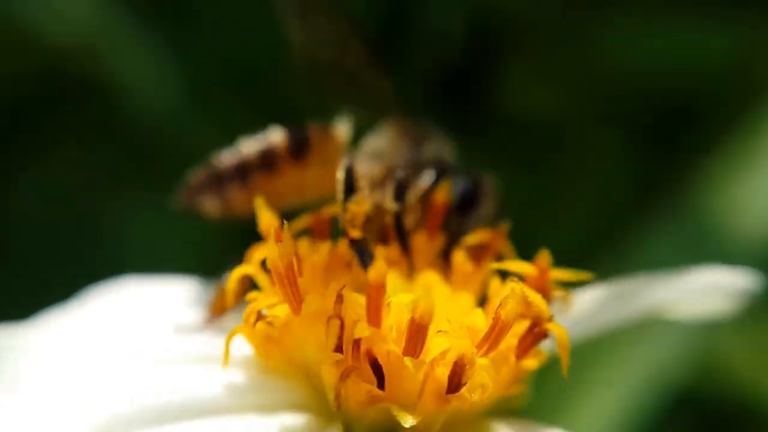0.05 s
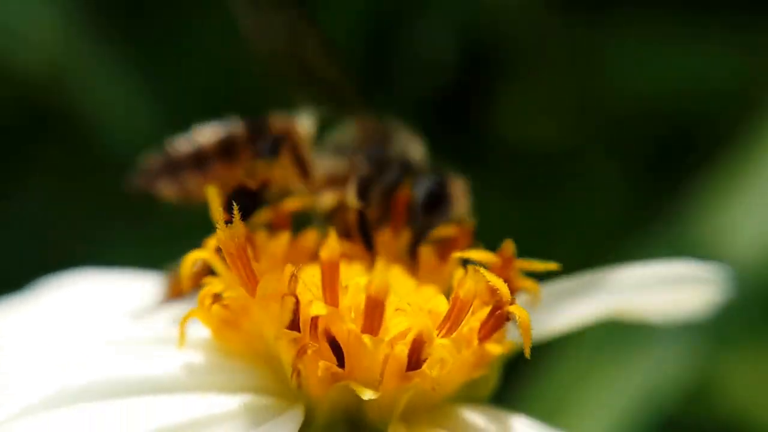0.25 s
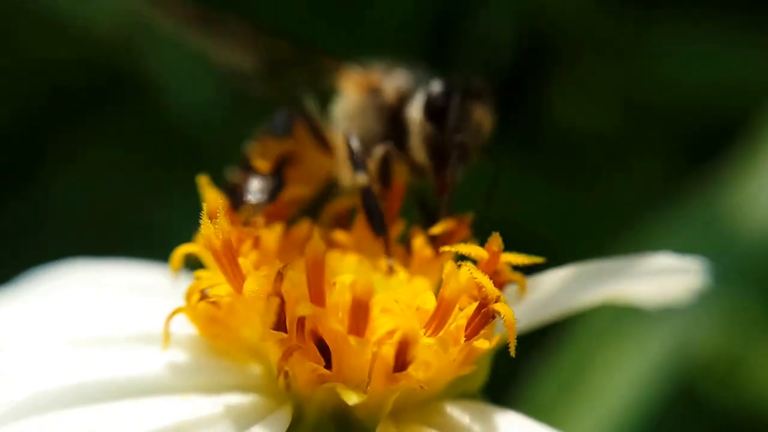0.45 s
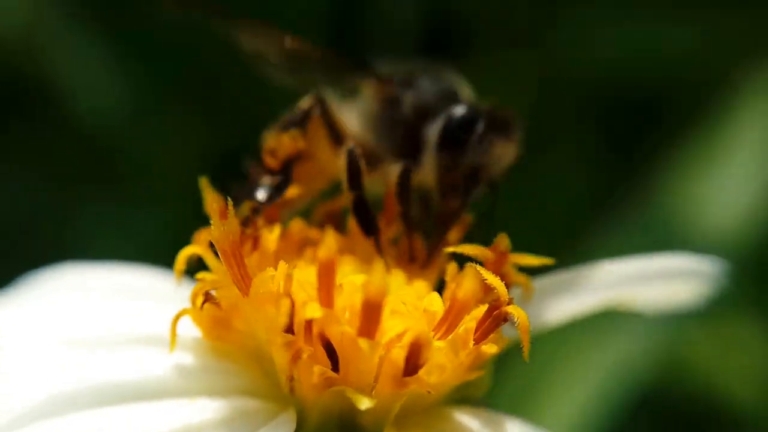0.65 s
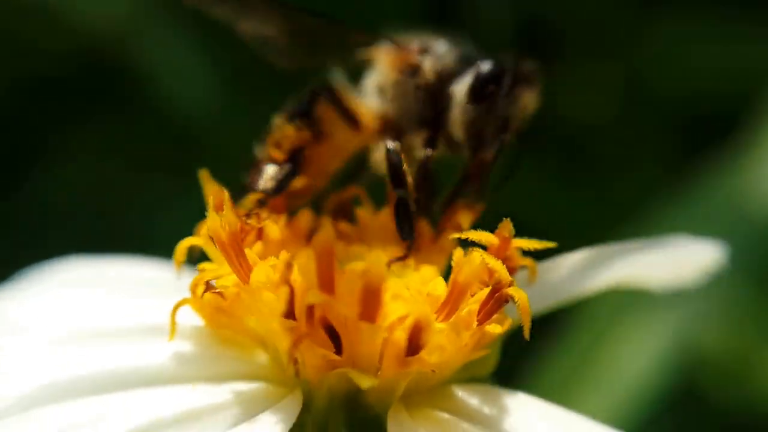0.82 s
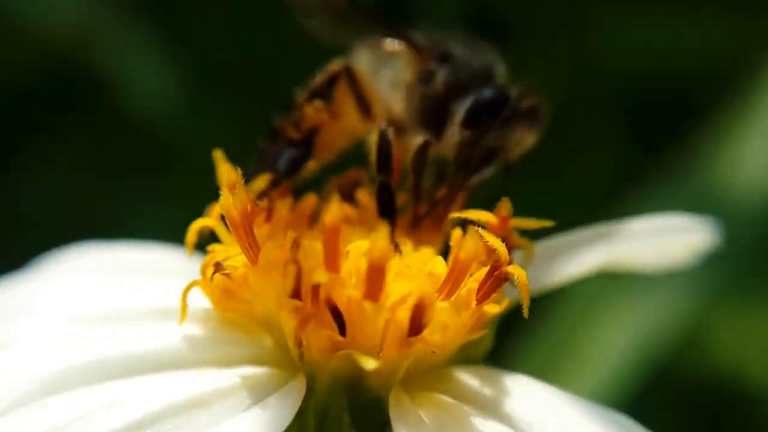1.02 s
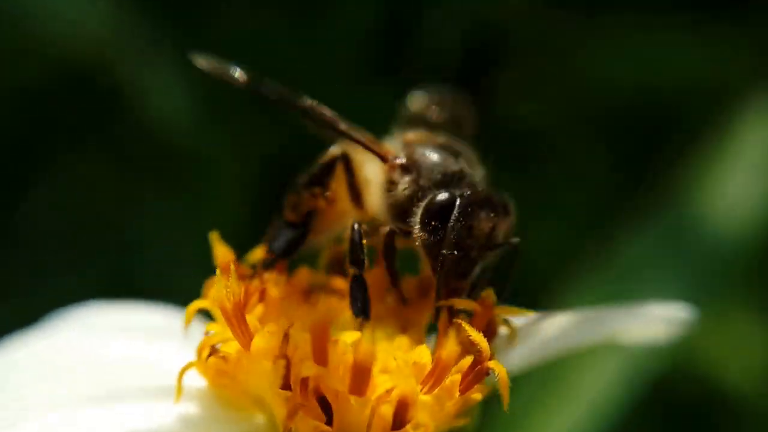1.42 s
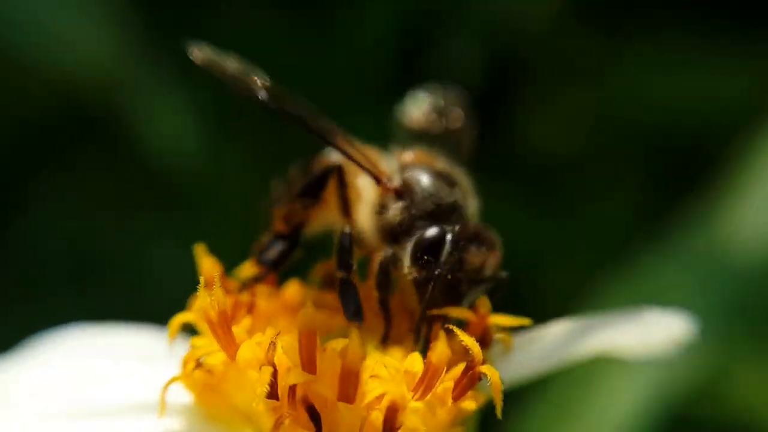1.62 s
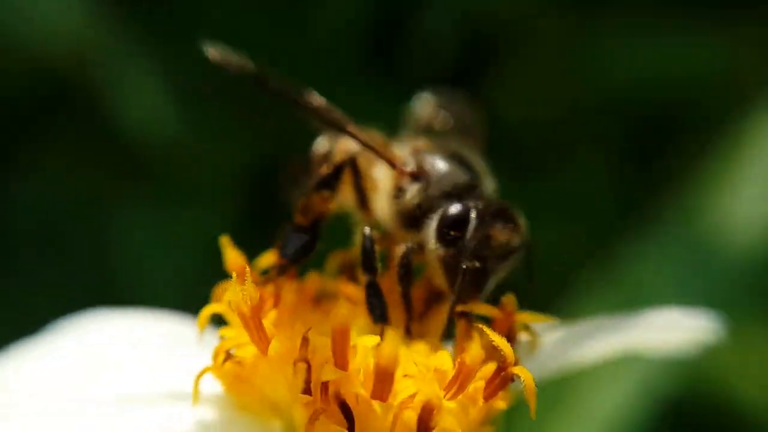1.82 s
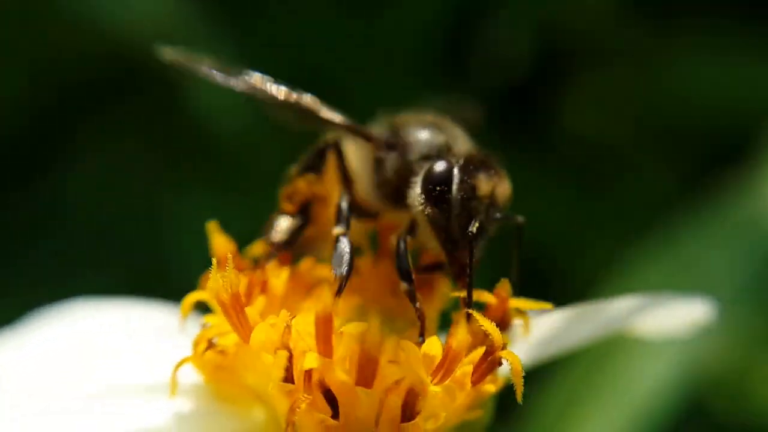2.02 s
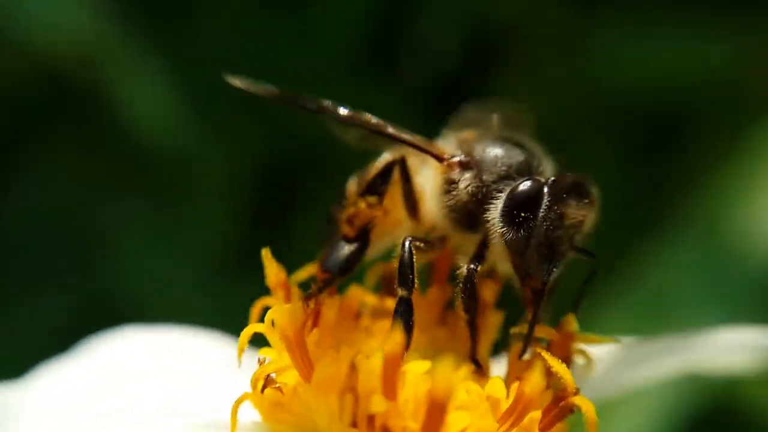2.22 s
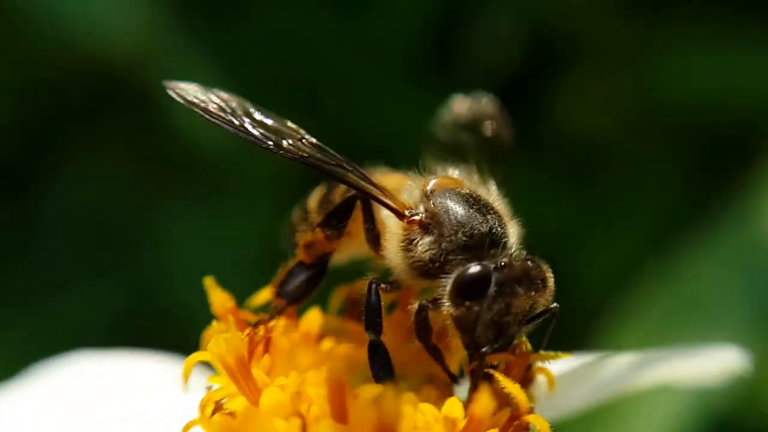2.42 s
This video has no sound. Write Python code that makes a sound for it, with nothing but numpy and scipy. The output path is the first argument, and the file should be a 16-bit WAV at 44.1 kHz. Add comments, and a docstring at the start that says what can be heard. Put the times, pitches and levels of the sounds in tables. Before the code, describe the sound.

A small bird chirps four times nearby over a faint outdoor rumble and hiss.

```python
"""Four high chirps from a small bird, close on the right: two arching whistles that fall away,
one that sweeps upward, then another arch. Each is a gliding tone with a weak octave.
Nearby surfaces scatter the calls back to the microphones and a faint long echo follows.
Behind the bird lie a steady distant rumble, a faint low drone that swells once,
a far-off bird and a soft outdoor hiss."""
import sys
import numpy as np
from scipy import signal
from scipy.fft import rfft, irfft, next_fast_len
from scipy.io import wavfile
from scipy.ndimage import uniform_filter1d, map_coordinates

SR = 44100
rng = np.random.default_rng(int(sys.argv[2]) if len(sys.argv) > 2 else 0)


def digitize_waveform(pressure):
    """Quantize a signal to 16-bit integers and store it at the path in sys.argv[1].

    Rows of a 2-D input are taken as channels; values are limited to [-1, 1].
    """
    field = np.atleast_2d(pressure).T
    bounded = np.clip(field, -1, 1)
    quanta = np.round(bounded * 32767).astype(np.int16)
    wavfile.write(sys.argv[1], SR, quanta)


N = 112454

# the two shapes of whistle: t/length, f/top pitch, level/dB
ARCH = [(0, .64, -39), (0.069, .84, -21), (.13, 0.9737, -3), (0.239, 0.9933, 1), (.35, 0.97, 0),
        (0.501, .91, -5.5), (.75, 0.73, -12.5), (0.999, .58, -27)]
UPSWEEP = [(0, .68, -29), (0.101, .74, -16.5), (0.329, .82, -11), (0.438, .90, -6.5), (.53, 0.99, 1),
           (.64, 0.963, 0), (0.781, .81, -16), (1, 0.56, -27.5)]
# close bird: start t/s, length t/s, top f/Hz, level/dB, start-to-end gain/dB, octave level/dB, shape
CHIRPS = [(0.202, .101, 5397, -10.5, -2.5, -42.5, ARCH), (.933, 0.0977, 5351, -12.5, -5, -45.5, ARCH),
          (1.543, .079, 5448, -12, 0, -40.5, UPSWEEP), (2.143, 0.1, 5207, -13.5, 2, -40, ARCH)]
# colour of the second harmonic: f/Hz, level/dB
OCTAVE_COLOUR = [(6200, -8), (7700, -1.5), (9000, -2), (10200, -4.5), (10800, -14)]
# second voice, opening the arching chirps: start t/s, level/dB
WISPS = [(0.196, -29.5), (.927, -33.5), (2.134, -29.5)]
# colouring of both birds by the left microphone: f/Hz, level/dB
LEFT_SHADE = [(3000, -3.5), (4000, -8.5), (4800, -7), (5400, -13), (10000, -20.5)]
# calls of the far-off bird: middle t/s, level/dB
FAR_CALLS = [(.685, -51), (1.33, -53)]
# spectra of the far calls, the rumble and the hiss on each side: f/Hz, relative level/dB
FAR_COLOUR = [(4800, -40), (5900, -2), (6600, 0), (7100, -7.5), (8200, -40)]
RUMBLE_COLOUR = [(20, -28), (35, -21), (50, -14), (63, 2), (78, -9.5), (100, 0), (130, -2.5), (200, -7.5),
                 (280, -10.5), (350, -14), (550, -16), (800, -18), (1200, -23.5), (2000, -30.5),
                 (4000, -39)]
HISS_LEFT = [(500, -32.5), (1000, -2), (1600, -3), (2300, 2), (2900, 7.5), (3400, -2), (4300, -5),
             (6000, -11.5), (7600, -19), (10000, -21), (14500, -29.5)]
HISS_RIGHT = [(500, -13.5), (1000, -3), (1600, -7), (2800, -2.5), (3500, -4), (5400, 3.5), (6400, 0.5),
              (7500, -4), (8800, -7), (10000, -4.5), (11200, -13), (14500, -33)]
# likeness of the rumble at the two microphones: f/Hz, correlation
RUMBLE_LIKENESS = [(60, 0.948), (130, 0.96), (290, 0.904), (620, 0.498), (1000, 0.26), (1400, -0.782),
                   (3000, -0.49)]

WAVER_RATE = 500  # unsteadiness of the close bird's voice, knots a second


def chirp(start, length, top_hz, level_db, swell_db, octave_db, shape):
    """One gliding whistle, loudest at the top of its pitch, with a faint, fluttering octave."""
    t = np.arange(N) / SR - start
    progress = np.clip(t / length, 0, 1)
    when, pitch, effort_db = np.transpose(shape)
    attack_s, release_s, glide_s = .001, .002, .0052
    hz = top_hz * uniform_filter1d(np.interp(progress, when, pitch), int(glide_s * SR))
    phase = 2 * np.pi * np.cumsum(hz * (1 + .0037 * wobble(WAVER_RATE))) / SR
    gate = np.clip(t / attack_s, 0, 1) * np.clip((length - t) / release_s, 0, 1)
    loud_db = level_db + np.interp(progress, when, effort_db) + swell_db * (progress - .5)
    tone = amp(loud_db + .23 * wobble(WAVER_RATE)) * np.sin(phase)
    octave = amp(octave_db + along(OCTAVE_COLOUR, 2 * hz) + 4 * wobble(WAVER_RATE)) * np.sin(2 * phase)
    return gate * (tone + octave)


def wisp(start, level_db, length_s=.034, start_hz=5807, sag_hz_per_s=20000):
    """The bird's second voice: a brief, raspy, falling tone just above the whistle."""
    t = np.clip(np.arange(N) / SR - start, 0, length_s)
    hz = (start_hz - sag_hz_per_s * t) * (1 + .093 * wobble(WAVER_RATE))
    return amp(level_db) * np.sin(np.pi * t / length_s) * np.sin(2 * np.pi * np.cumsum(hz) / SR)


def near_reflections(call, count=3, each_db=-7.5):
    """Reflections close to the bird beat against the glide without changing its overall level."""
    delays_s = .004 + .008 * rng.random(count)
    comb = lambda hz: 1 + amp(each_db) * sum(np.exp(-2j * np.pi * hz * s) for s in delays_s)
    return call.std() * unit(filtered(call, comb))


def diffuse_tail(call, left_db, delay_s, build_s, t60_s):
    """Dense reflections build up and die away, as strong on the right as the call."""
    t = np.maximum(np.arange(SR) / SR - delay_s, 0)
    tail = rng.standard_normal((2, SR)) * (1 - np.exp(-t / build_s)) * amp(-60 * t / t60_s)
    left, right = signal.fftconvolve(call[None], tail, axes=1)[:, :N]
    return call.std() * np.array([amp(left_db) * unit(left), unit(right)])


def close_bird(left_db=-4.5, left_lag_s=.0004051):
    """Each call arrives directly, off nearby surfaces and as a long echo, all weaker on the left."""
    calls = [chirp(*row) for row in CHIRPS]
    calls.append(sum(wisp(*row) for row in WISPS))
    pair = np.zeros((2, N))
    for call in calls:
        right = near_reflections(call)
        left = amp(left_db) * filtered(right, lambda hz: np.exp(-2j * np.pi * hz * left_lag_s))
        scatter = amp(-7.5) * diffuse_tail(call, left_db=1.5, delay_s=.008, build_s=.016, t60_s=.165)
        echo = amp(-16.5) * diffuse_tail(call, left_db=-2.5, delay_s=.047, build_s=.043, t60_s=.92)
        pair += np.array([left, right]) + scatter + echo
    return np.array([shaded(pair[0]), pair[1]])


def shaded(call):
    """The left microphone colours what it hears: a call sounds weaker and duller there."""
    return filtered(call, lambda hz: amp(along(LEFT_SHADE, hz)))


def far_bird(width_s=.03):
    """High calls smeared by distance into soft puffs, mostly on the right."""
    t = np.arange(N) / SR
    swell = sum(amp(db) * np.exp(-.5 * ((t - middle) / width_s) ** 2) for middle, db in FAR_CALLS)
    return swell * np.array([shaded(noise(FAR_COLOUR)), noise(FAR_COLOUR)])


def drone(pitch_hz=276, level_db=-49.5, peak_s=1.57, width_s=.21):
    """A faint, wavering low tone swells and fades in the distance."""
    swell = np.exp(-.5 * ((np.arange(N) / SR - peak_s) / width_s) ** 2)
    hz = pitch_hz * (1 + .016 * wobble(27))
    return amp(level_db) * swell * np.sin(2 * np.pi * np.cumsum(hz) / SR)


def rumble(level_db=-41.5):
    """Distant rumble, its bass nearly the same at both microphones."""
    angle = lambda hz: np.arccos(along(RUMBLE_LIKENESS, hz)) / 2
    mid = filtered(noise(RUMBLE_COLOUR), lambda hz: np.cos(angle(hz)))
    side = filtered(noise(RUMBLE_COLOUR), lambda hz: np.sin(angle(hz)))
    return amp(level_db) * drift() * unit(np.array([mid + side, mid - side]))


def hiss(left_db=-48.5, right_db=-45.5):
    """Soft outdoor hiss, brighter on the right."""
    return np.array([amp(left_db) * noise(HISS_LEFT), amp(right_db) * noise(HISS_RIGHT)]) * drift()


def drift(depth_db=.5):
    """Slow wander of the background level, as a gain."""
    return amp(depth_db * wobble(3.778))


def amp(db):
    """Decibels to gain."""
    return 10 ** (np.asarray(db) / 20)


def unit(x):
    """Scaled to rms 1."""
    return x / np.sqrt(np.mean(x ** 2) + 1e-20)


def along(points, hz):
    """(f/Hz, value) points read on a log axis."""
    f, v = np.transpose(points)
    return np.interp(np.log(hz + 1), np.log(f + 1), v)


def wobble(rate):
    """A smooth random curve, rate knots a second."""
    return map_coordinates(rng.standard_normal(N), [np.arange(N) * rate / SR])


def filtered(x, response):
    """x through a frequency response."""
    size = next_fast_len(N + SR // 2)
    return irfft(rfft(x, size) * response(np.fft.rfftfreq(size, 1 / SR)), size)[..., :N]


def noise(spectrum):
    """Coloured noise of rms 1."""
    return unit(filtered(rng.standard_normal(N), lambda hz: amp(along(spectrum, hz))))


def scene():
    """Both birds over the outdoor background, at a stereo pair of microphones."""
    return rumble() + hiss() + drone() + close_bird() + far_bird()


def record(dry):
    """The camera keeps nothing above its band limit."""
    return filtered(dry, lambda hz: hz < 14530)


dry = scene()
out = record(dry)
digitize_waveform(out)
```